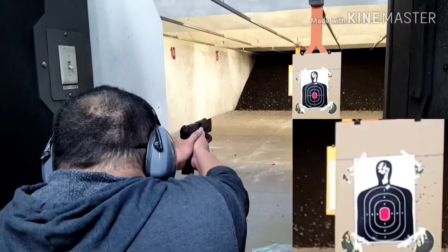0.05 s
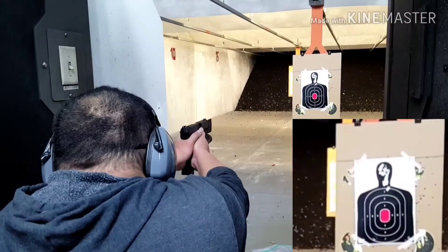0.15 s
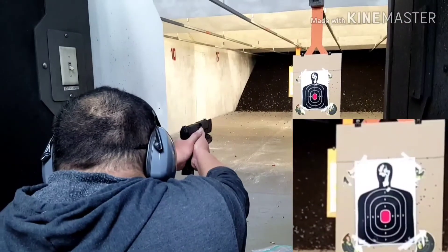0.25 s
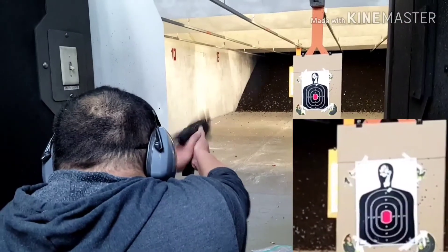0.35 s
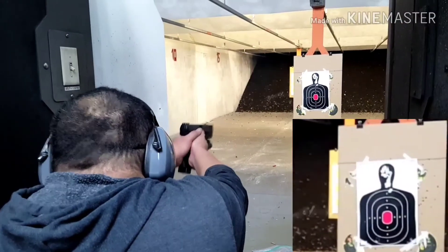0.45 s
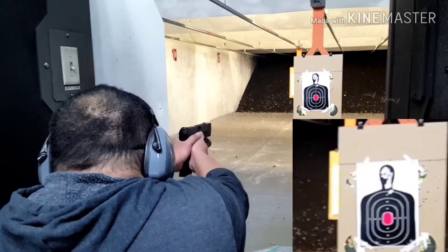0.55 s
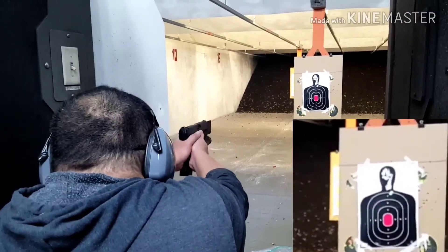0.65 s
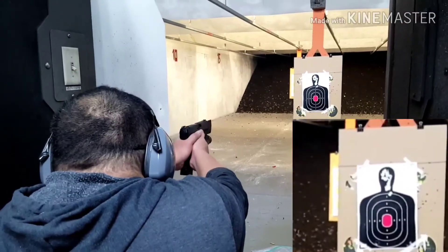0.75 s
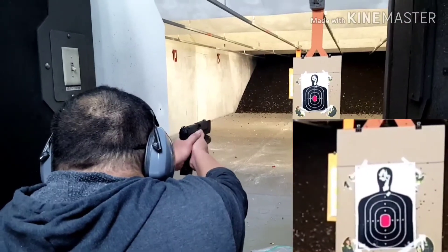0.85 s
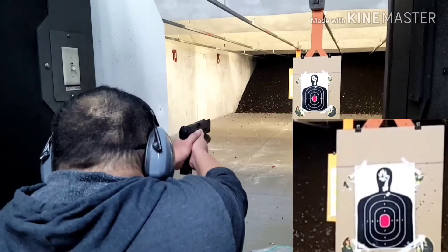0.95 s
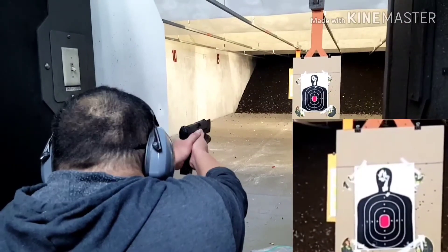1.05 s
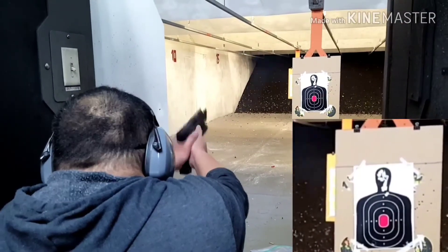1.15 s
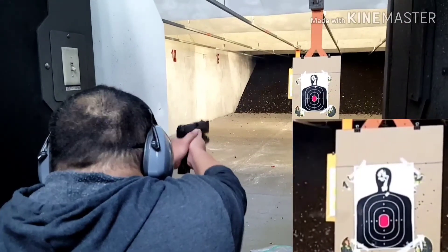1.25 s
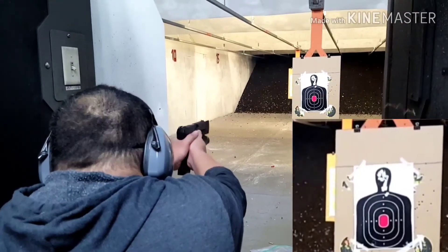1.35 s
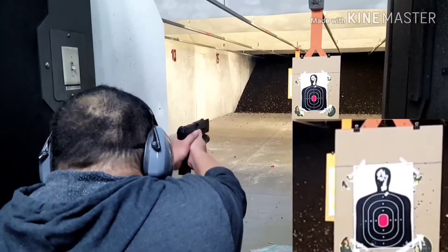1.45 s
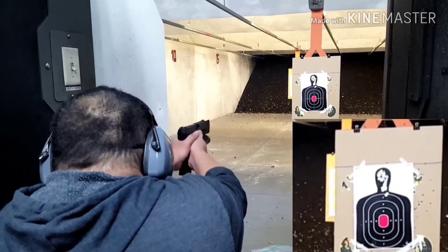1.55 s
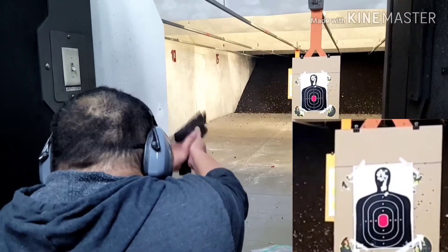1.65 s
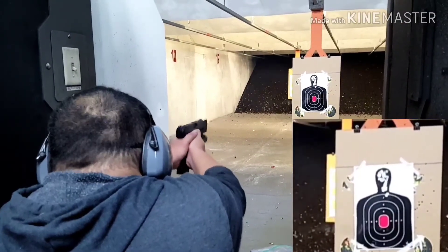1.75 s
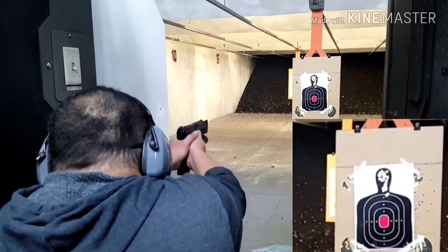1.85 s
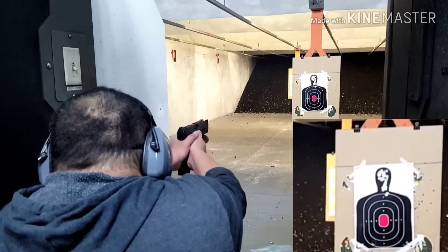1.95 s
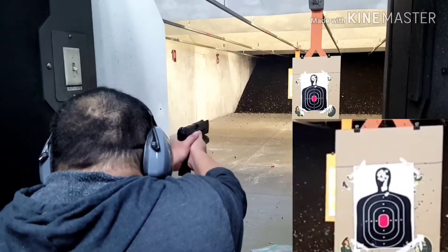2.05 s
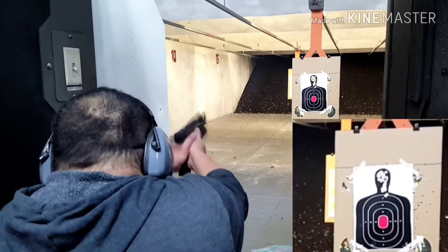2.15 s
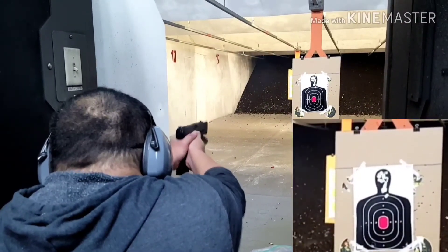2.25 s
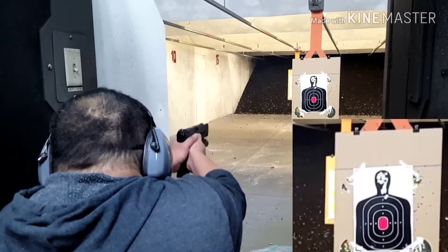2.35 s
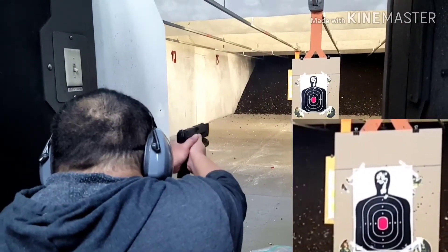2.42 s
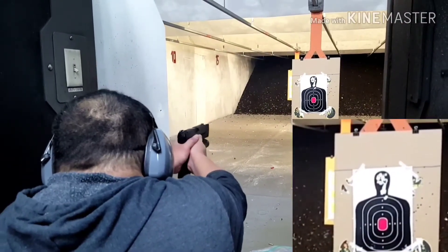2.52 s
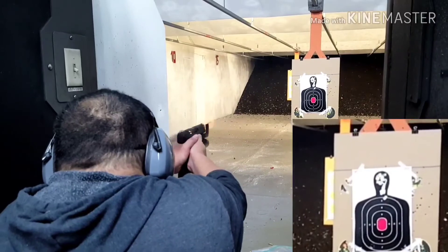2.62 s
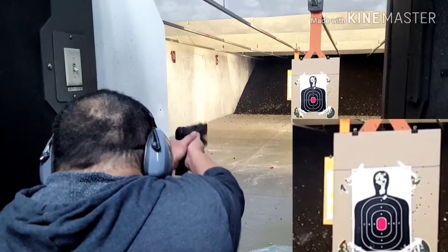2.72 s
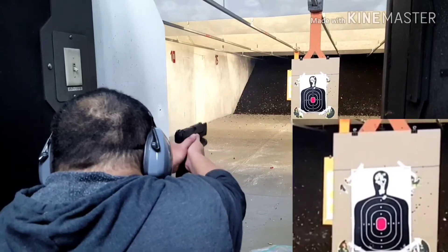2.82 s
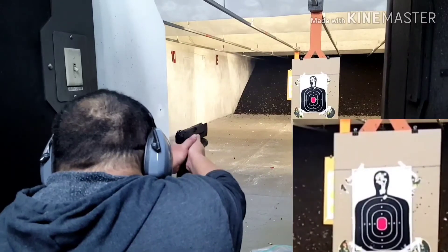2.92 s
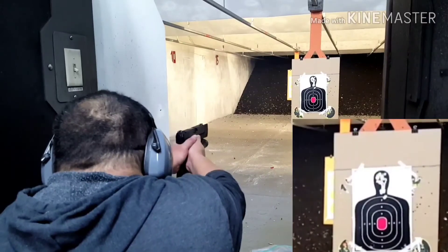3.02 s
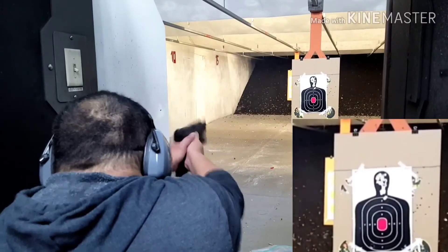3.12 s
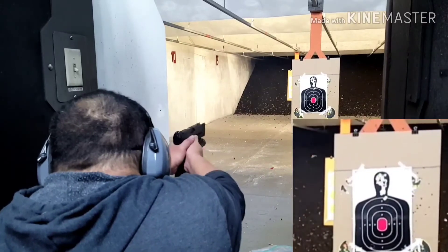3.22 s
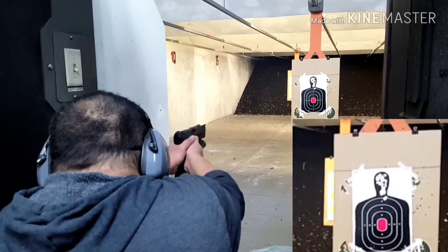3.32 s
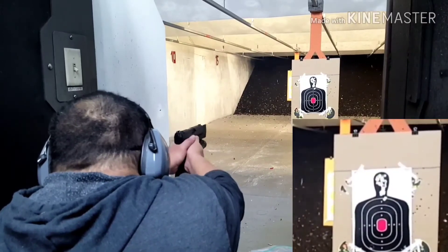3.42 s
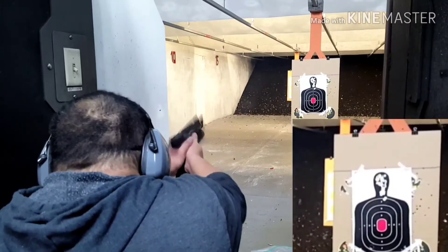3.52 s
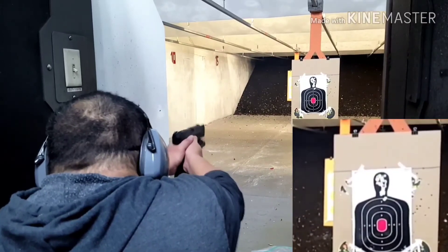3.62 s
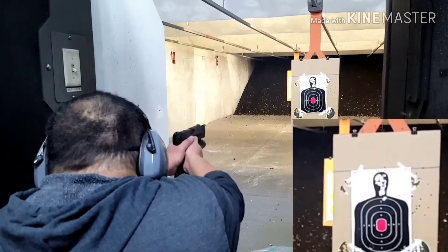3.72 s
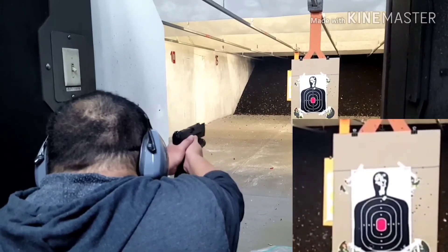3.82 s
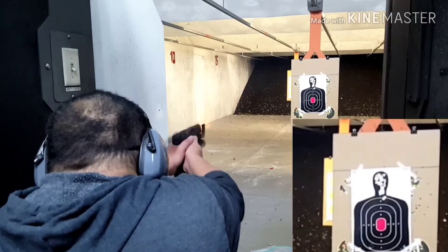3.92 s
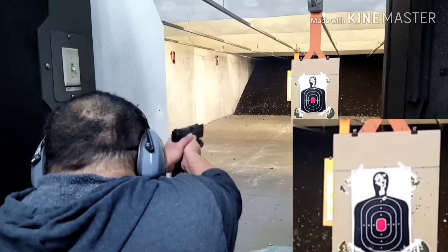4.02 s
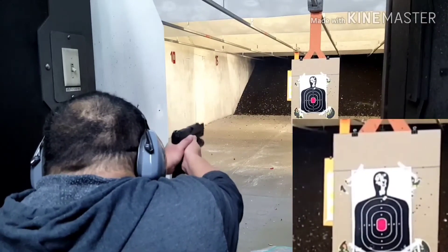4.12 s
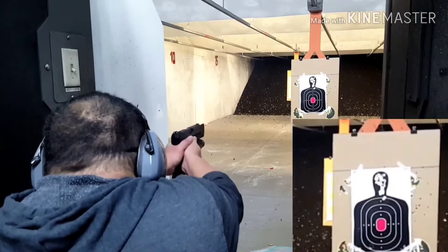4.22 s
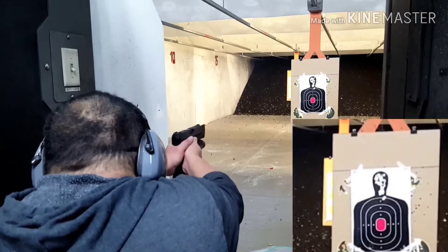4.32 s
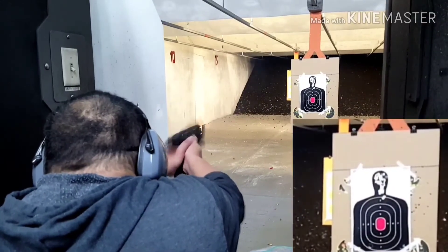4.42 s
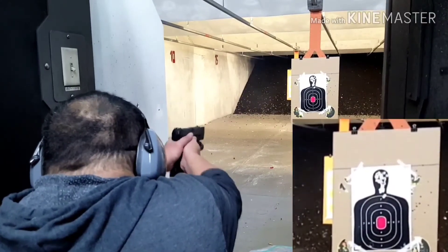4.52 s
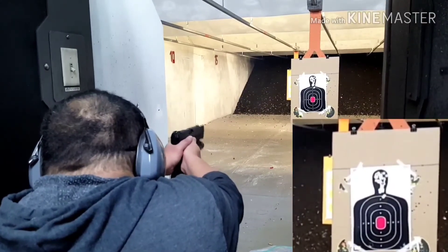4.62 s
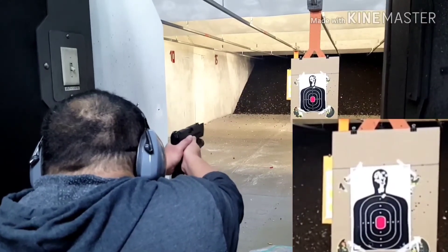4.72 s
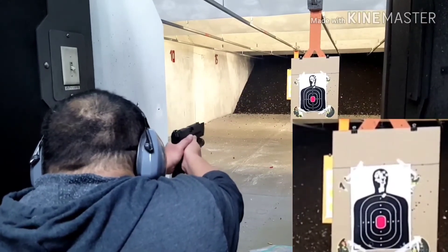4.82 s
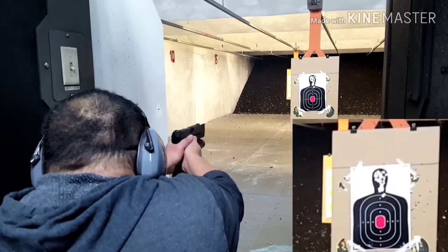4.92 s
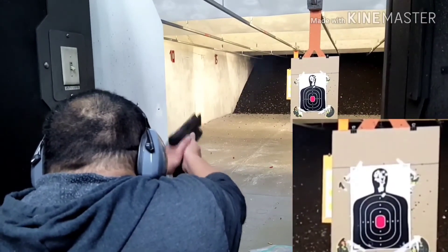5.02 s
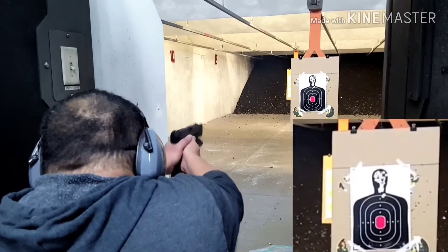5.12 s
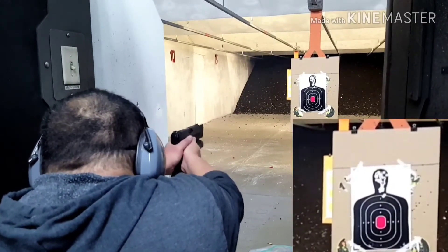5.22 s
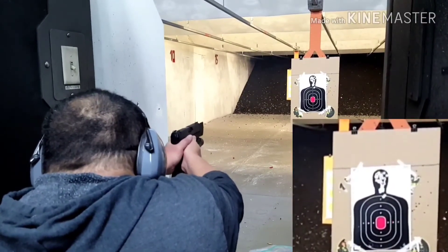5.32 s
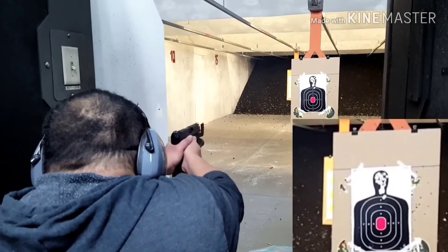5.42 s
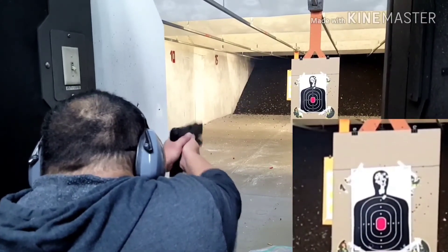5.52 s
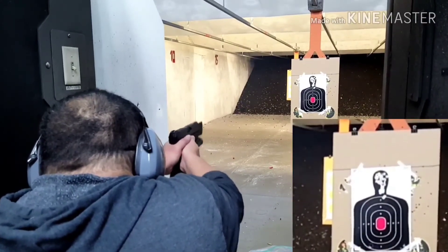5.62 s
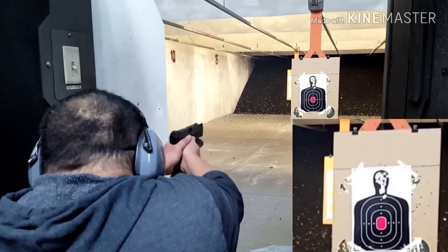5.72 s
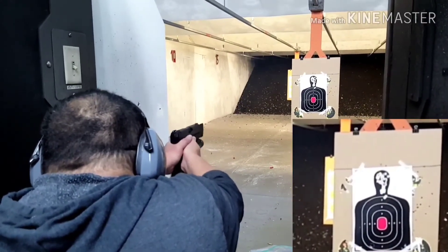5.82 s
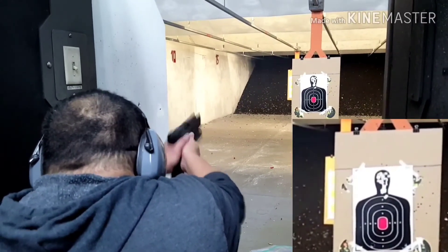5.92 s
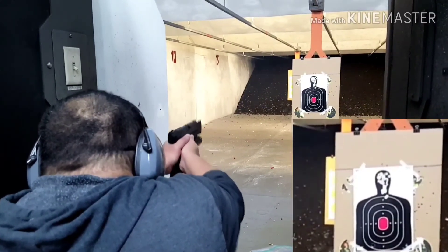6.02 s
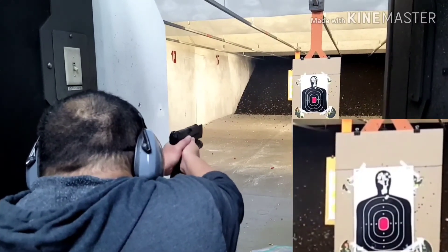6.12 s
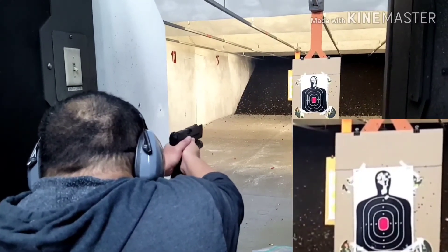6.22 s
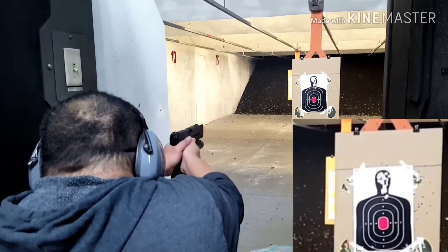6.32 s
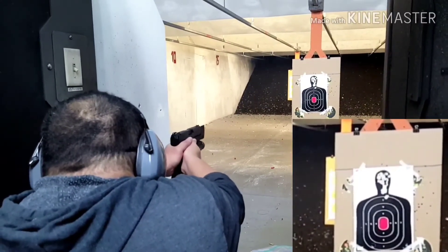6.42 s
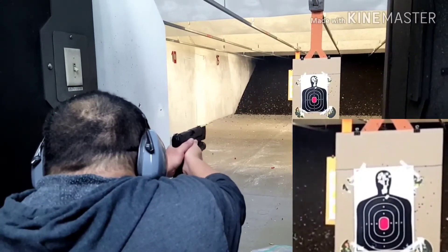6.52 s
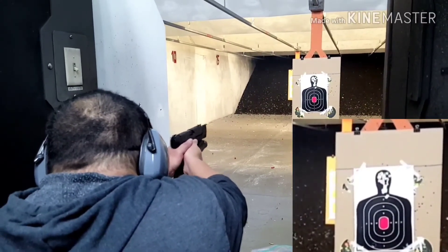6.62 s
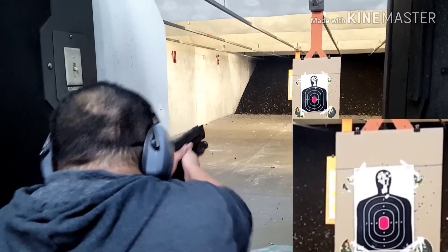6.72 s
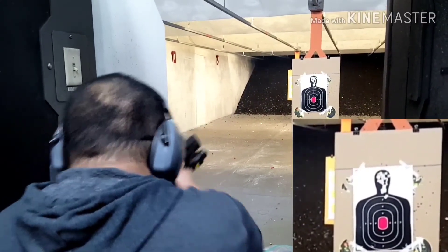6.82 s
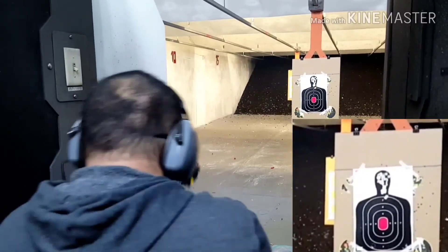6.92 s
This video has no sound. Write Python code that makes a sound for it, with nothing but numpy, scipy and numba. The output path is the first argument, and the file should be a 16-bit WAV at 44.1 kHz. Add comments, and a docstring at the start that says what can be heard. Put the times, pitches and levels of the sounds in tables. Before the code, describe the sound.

A handgun fires steadily about every half second, each distorted blast booming down a long hard lane, with ejected casings tinkling between shots.

```python
"""Twelve pistol shots in a long, low concrete lane, an arm's length from two microphones.
First a ventilation rush, noise and fan tones, hums under a raised gain, which each blast pulls down.
Each blast overloads the microphones: the wave wraps at full scale and fizzes for a fifth of a second.
Then the lane's boom and echoes come through clean, as decaying noise bands, standing waves and returns.
Brass cases crack and ring on the floor; dull clacks, some together with a case's crack, fall among the
later shots and after them."""
import sys
import numpy as np
from scipy import signal
from scipy.fft import rfft, irfft
from scipy.io import wavfile
from scipy.ndimage import uniform_filter1d
from numba import njit

SR = 44100
rng = np.random.default_rng(int(sys.argv[2]) if len(sys.argv) > 2 else 0)


def pcm_store(signal):
    """Save signal as 16-bit PCM."""
    levels = np.round(np.clip(np.atleast_2d(signal), -1, 1) * 32767)
    wavfile.write(sys.argv[1], SR, levels.astype(np.int16).T)


N = 306936
LEFT_LAG = 10  # samples by which shared sound reaches the left microphone later

# Ventilation rush, spectral shape: f/Hz, relative level/dB per Hz
AIR_SPECTRUM = [(15, -75.5), (25, -30), (108, -24.5), (195, -28), (242, -17), (394, -10.5), (427, -11.5),
                (607, -17.5), (1130, -13.5), (3160, -26.5), (3520, -33), (5000, -41.5), (14800, -81.5),
                (16000, -69.5)]
# Fan tones: f/Hz, relative level/dB
FAN_TONES = [(108, -46), (165, -47), (242, -47.5), (427, -48), (500, -51.5), (888, -49), (3418, -73.5),
             (3585, -66), (4500, -69)]
AIR_DB, HUM_DB = -52.5, -52  # rms, before the gain control

# Blasts: t/s, blast level/dB applied to the lane's response, mean break-up length/s
SHOTS = [(0.4586, 1.5, 0.2), (1.2384, 1.5, 0.2), (1.7445, 1.5, 0.21), (2.2488, 1.5, .2), (2.7505, 2, .202),
         (3.1775, 1.5, .206), (3.619, 2, 0.2), (4.0498, 2, 0.2), (4.5398, 2, .2), (5.1114, 2, 0.2),
         (5.5655, 2, .204), (6.0009, 2.5, 0.2)]
# Diffuse field of the lane: f/Hz, level/dB at SETTLED_S before blast level and muting, t60/s,
# likeness of left and right (0-1)
LANE_BANDS = [(139.7, -39, 1.6, .9), (202.44, -33, 1.5, .9), (298.3, -28.5, 1.0, .9), (432, -31, 1.0, .85),
              (597.5, -22.5, .9, .7), (853.5, -23, 1.2, .6), (1144, -24, 1.0, .5), (1554, -20, .85, .5),
              (2100, -24.5, 0.93, .3), (2921, -30, .75, .1), (3979, -34.5, .65, .05),
              (5527, -39, 0.53, .05), (7928, -43, .5, .05), (12008, -47.5, .4, .05)]
# Standing waves of the booth: f/Hz, amplitude/dB at SETTLED_S before blast level and muting, t60/s
BOOTH_MODES = [(539.1, -31, .7), (626.3, -30, .6), (703.4, -30, .6), (803, -33, .8), (869.3, -29, 1.5),
               (913.4, -34, 1.9), (937.6, -33, 1.3), (1016.6, -32, .7), (1155.8, -30.5, .6),
               (1366, -33, .6)]
# Strong returns along the lane: t/s after the shot, peak level/dB before blast level, f/Hz
ECHOES = [(0.051, -15, 714.7), (0.072, -11.5, 1278), (.116, -12.5, 893), (.156, -13.5, 1795),
          (0.229, -11.5, 1330), (0.258, -21, 622), (.291, -15.5, 1425), (0.307, -15.5, 610),
          (0.33, -13, 1800), (0.358, -20.5, 1400)]
# Far end of the lane, dying away last, spectral shape: f/Hz, relative level/dB per Hz
FAR_SPECTRUM = [(120, -17), (200, -4), (500, -3), (880, 0), (1400, -5), (2300, -8), (3500, -19),
                (6000, -34.5), (16000, -79)]
# Close booth modes that throb together: f/Hz, relative level/dB
THROB_MODES = [(345, -8), (377, -0.5), (420, 0), (443, 0), (480, -6), (510, -9), (545, -5)]
SETTLED_S = .2  # reference time after a blast, about when the break-up ends
BOOM_TOP_HZ = 700  # below this the diffuse sound counts as boom
FAR_DB, FAR_T60_S = -33, 2.2  # level at SETTLED_S, before blast level and muting
BOOTH_WAVER, THROB_WAVER = .008, .034  # random phase step, radians a sample: blurs each line
ECHO_CYCLES = 3.8  # half length of a return, in cycles of its pitch
# Lesser returns, scattered at random in time, pitch and level: the base level is that at SETTLED_S
SCATTER_COUNT, SCATTER_DB, SCATTER_SPREAD_DB, SCATTER_T60_S = 60, -23, 3, .8
SCATTER_LO_HZ, SCATTER_HI_HZ = 1000, 2600
THROB_START_DB, THROB_TOP_DB = -33, -13.5
THROB_RISE_S, THROB_HOLD_S, THROB_T60_S = .19, .13, .42
# Time between returns, moment of one return, growth of the dips between them
ROUND_TRIP_S, RETURN_S, DIP_DEEPENS_DB_S = .058, .32, 69

# Spectral shapes of the overload's low and high grit: f/Hz, relative level/dB per Hz
RUMBLE_SPECTRUM = [(15, -6.5), (30, -3.5), (70, -6.5), (200, -0.5), (450, -4.5), (900, -14), (20000, -86)]
FIZZ_SPECTRUM = [(2500, -33), (4500, 3), (7000, 1), (10000, -1.5), (13500, -3.5), (16000, -6)]
DRIVE_DB, DRIVE_FALL_DB_S = 30, 92  # overdrive at the blast and its fall
# The clean sound is muted at the blast and comes back steadily
BRIGHT_MUTE_DB, BRIGHT_BACK_S, BOOM_MUTE_DB, BOOM_BACK_S = -17, .17, -25, .23
# Grit level/dB at the blast, at the crest and at SETTLED_S, before patches and lulls
CREST_S = .11
RUMBLE_DB, RASP_DB, FIZZ_DB = (-26.5, -9.5, -20.5), (-12.5, -7, -15.5), (-15.5, -11.5, -15.5)
PATCH_DB = 1.5  # rms swing of the fizz level
# Three lulls before the break-up stops, each shorter than the last; edges scatter at random
LULL_FIRST_S, LULL_EVERY_S, LULL_LENGTH_S, LULL_SHRINK = .176, .011, .0068, .48
LULL_DB, LULL_SCATTER_S = -9.5, .0013

# Brass cases striking floor and walls: t/s, crack level/dB at onset before its room tail,
# ring level/dB before mode levels and tumbling
CASES = [(0.7108, -29.5, -72), (0.9707, -52.5, -84), (0.9837, -46, -82), (1.0204, -65.5, -95.5),
         (1.494, -31.5, -45), (1.9839, -30.5, -60.5), (2.2059, -50, -66), (2.5466, -38.5, -39),
         (2.7217, -52, -39), (2.9806, -31, -53), (3.1128, -44, -50), (3.4451, -38.5, -52),
         (3.8694, -61, -42), (3.929, -51, -51), (4.2896, -28, -42.5), (4.7894, -49, -45.5),
         (5.464, -54, -38.5), (5.4949, -57, -57), (5.5164, -68, -51), (5.8294, -58, -74.5),
         (6.4453, -63, -57), (6.4936, -33, -48.5)]
# Modes of a brass case: f/Hz, relative level/dB, t60/s
BRASS_MODES = [(9927, 0, .25), (9950, -4, .3), (9915, -11, 1.3), (13700, -14, .1)]
CRACK_HZ, CRACK_WIDTH_HZ, CRACK_T60_S = 8450, 6700, .087
CRACK_ROOM_DB, CRACK_ROOM_T60_S = -15.5, .223  # room tail relative to the crack

# Small dull clacks, the last ones as the gun is lowered: t/s, noise level/dB before its decay
CLACKS = [(2.9694, -24), (3.9284, -26), (4.2894, -27), (5.831, -17), (6.2677, -19), (6.7716, -58),
          (6.8184, -54), (6.8578, -56), (6.9083, -47)]
CLACK_HZ, CLACK_T60_S = 3050, .04

# Gain control: boost in quiet, rms threshold, time constants of fall and recovery
QUIET_BOOST_DB, LOUD_DB, DUCK_S, RECOVER_S = 16, -16, .002, 4.
TOP_HZ = 15550


def undb(db):
    """Decibel law: amplitude ratio from a level."""
    return 10 ** (np.asarray(db) / 20)


def level(x, db):
    """Root-mean-square scaling to a level in dB."""
    return x * undb(db) / np.sqrt(np.mean(x ** 2))


def fade(t, t60):
    """Exponential decay by 60 dB in t60, silent before zero."""
    return (t >= 0) * np.exp(-np.log(1000) * np.maximum(t, 0) / t60)


def band(x, lo_hz, hi_hz):
    """Band-pass filtering along the last axis."""
    edges = [lo_hz, min(hi_hz, .45 * SR)]
    return signal.sosfilt(signal.butter(2, edges, "band", fs=SR, output="sos"), x)


def coloured(x, points):
    """Spectral shaping by (f/Hz, level/dB) points, interpolated over log frequency."""
    size, (hz, db) = x.shape[-1], np.transpose(points)
    f = np.maximum(np.arange(size // 2 + 1) * SR / size, 1)
    gain = undb(np.interp(np.log(f), np.log(hz), db, left=-80))
    return irfft(rfft(x) * gain, size)


def pair(size, likeness):
    """Partial coherence: left and right noise with a shared part, later at the left."""
    shared, left, right = rng.standard_normal((3, size))
    share = np.clip(likeness, 0, 1)
    common = np.array([np.roll(shared, LEFT_LAG), shared])
    return np.sqrt(share) * common + np.sqrt(1 - share) * np.array([left, right])


def add(out, s, sound):
    """Superposition: mix a sound in at s seconds."""
    i = int(s * SR)
    out[:, i:i + sound.shape[-1]] += sound[..., :N - i]


def ventilation():
    """Flow noise and fan tones: a coloured, partly shared rush with sines of wandering phase."""
    t = np.arange(N) / SR
    late = t - np.array([[LEFT_LAG], [0]]) / SR
    rush = coloured(pair(N, .27), AIR_SPECTRUM)
    tones = 0
    for hz, db in FAN_TONES:
        waver = np.cumsum(rng.standard_normal(N)) * .05
        tones = tones + undb(db) * np.sin(2 * np.pi * hz * late + waver)
    return level(rush, AIR_DB) + level(tones, HUM_DB)


def throb(late):
    """Beating of close booth modes, evened out so that the swell follows the returns along the lane."""
    waves = 0
    for hz, db in THROB_MODES:
        wander = THROB_WAVER * np.cumsum(pair(late.shape[1], .98), axis=1)
        phase = rng.uniform(0, 2 * np.pi) + wander
        waves = waves + undb(db) * np.exp(1j * (2 * np.pi * hz * late + phase))
    even = waves / (np.abs(waves) + .6)
    rise = np.clip(late / THROB_RISE_S, 0, 1)
    dying = np.maximum(late - THROB_RISE_S - THROB_HOLD_S, 0) * 60 / THROB_T60_S
    depth = DIP_DEEPENS_DB_S * np.clip(late - THROB_RISE_S / 2, 0, THROB_RISE_S + THROB_HOLD_S)
    dips = depth * np.sin(np.pi * (late - RETURN_S) / ROUND_TRIP_S) ** 2
    swell = undb(THROB_START_DB + (THROB_TOP_DB - THROB_START_DB) * rise - dying - dips)
    return band(level(even.real, 0) * swell, 260, 900)


def lesser_returns():
    """Random scattering in time, pitch and level; the base level sinks exponentially with time."""
    when, pitch, size = rng.random((SCATTER_COUNT, 3)).T
    when = SETTLED_S * (1 + 2 * when)
    sinking = 60 * (when - SETTLED_S) / SCATTER_T60_S
    db = SCATTER_DB - SCATTER_SPREAD_DB * np.log(size) - sinking
    hz = SCATTER_LO_HZ * (SCATTER_HI_HZ / SCATTER_LO_HZ) ** pitch
    return zip(when, db, hz)


def lane():
    """Reverberation: bright part, boom and returns, alike for every shot as gun and microphones stay put."""
    t = np.arange(int(1.6 * SR)) / SR
    late = t - np.array([[LEFT_LAG], [0]]) / SR
    parts = np.zeros((3, 2, len(t)))  # bright, boom, returns
    for hz, db, t60, likeness in LANE_BANDS:
        lo, hi = hz / 1.25, hz * 1.25
        wash = band(band(pair(len(t), likeness), lo, hi), lo, hi)
        decay = fade(t, t60) / fade(SETTLED_S, t60)
        parts[int(hz < BOOM_TOP_HZ)] += level(wash, db) * decay
    for hz, db, t60 in BOOTH_MODES:
        phase = rng.uniform(0, 2 * np.pi) + BOOTH_WAVER * np.cumsum(pair(len(t), .9), axis=1)
        wave = undb(db) * np.sin(2 * np.pi * hz * late + phase)
        parts[int(hz < BOOM_TOP_HZ)] += wave * fade(t, t60) / fade(SETTLED_S, t60)
    far = level(coloured(pair(len(t), .5), FAR_SPECTRUM), FAR_DB)
    parts[0] += far * fade(t, FAR_T60_S) / fade(SETTLED_S, FAR_T60_S)
    for s, db, hz in [*ECHOES, *lesser_returns()]:
        near = slice(int(s * SR) - 1000, int(s * SR) + 1000)
        cycles = (late[:, near] - s) * hz
        packet = np.exp(-(cycles / ECHO_CYCLES) ** 2) * np.sin(2 * np.pi * cycles)
        parts[2, :, near] += undb(db) * packet
    parts[2] += throb(late)
    return parts


def sputter(t, length):
    """Intermittency: a gate with three shrinking lulls and a scattered end at each microphone."""
    gate = 1. * (t < length + LULL_SCATTER_S * rng.standard_normal((2, 1)))
    for k, (early, late) in enumerate(LULL_SCATTER_S * rng.standard_normal((3, 2, 2, 1))):
        start = LULL_FIRST_S + k * LULL_EVERY_S
        end = start + LULL_LENGTH_S * LULL_SHRINK ** k
        gate[(t > start + early) & (t < end + late)] *= undb(LULL_DB)
    return uniform_filter1d(gate, size=24)


def breakup(room, length):
    """Overload: past full scale the microphone's count wraps, shattering into rumble, rasp and fizz."""
    t = np.arange(int(.23 * SR)) / SR
    drive = undb(DRIVE_DB - DRIVE_FALL_DB_S * t)
    bright = undb(BRIGHT_MUTE_DB * np.maximum(1 - t / BRIGHT_BACK_S, 0))
    boom = undb(BOOM_MUTE_DB * np.maximum(1 - t / BOOM_BACK_S, 0))
    rumble, rasp, fizz = (undb(np.interp(t, [0, CREST_S, SETTLED_S], db))
                          for db in (RUMBLE_DB, RASP_DB, FIZZ_DB))
    out, head = room.sum(axis=0), room[:, :, :len(t)]
    swing = drive * head.sum(axis=0) * (1 + .1 * rng.standard_normal())
    # modulo 2 wraps the noisy swing into -1 to 1
    shards = (swing + .15 * rng.standard_normal(swing.shape) + 1) % 2 - 1
    # the fizz comes in random patches
    patches = undb(PATCH_DB * level(uniform_filter1d(rng.standard_normal(swing.shape), size=90), 0))
    grit = rumble * level(coloured(shards, RUMBLE_SPECTRUM), 0)
    grit += rasp * level(band(shards, 424, 3590), 0)
    grit += fizz * patches * level(coloured(shards, FIZZ_SPECTRUM), 0)
    clean = bright * head[0] + boom * head[1] + head[2]
    out[:, :len(t)] = clean + sputter(t, length) * grit
    return out


def shots():
    """Impulsive excitation: each blast sounds the lane and breaks up the microphones."""
    out, room = np.zeros((2, N)), lane()
    for s, db, length in SHOTS:
        add(out, s, breakup(undb(db) * room, length))
    return out


def cases():
    """Impact and modal ringing: a bright crack with a room tail; the case rings unevenly as it tumbles."""
    out, t = np.zeros((2, N)), np.arange(int(.5 * SR)) / SR
    lo, hi = CRACK_HZ - CRACK_WIDTH_HZ / 2, CRACK_HZ + CRACK_WIDTH_HZ / 2
    for s, db, ring_db in CASES:
        hiss = level(band(pair(len(t), .55), lo, hi), 0)
        crack = hiss * (fade(t, CRACK_T60_S) + undb(CRACK_ROOM_DB) * fade(t, CRACK_ROOM_T60_S))
        ring = 0
        for hz, mode_db, t60 in BRASS_MODES:
            wave = np.sin(2 * np.pi * (hz * t + rng.random((2, 1))))
            ring = ring + undb(mode_db) * fade(t, t60) * wave
        # slow random swing of 3 dB rms
        tumble = undb(level(uniform_filter1d(rng.standard_normal(len(t)), size=700), 0) * 3)
        add(out, s, undb(db) * crack + undb(ring_db) * tumble * ring)
    return out


def clacks():
    """Damped impact: short dull knocks, as decaying band noise."""
    out, t = np.zeros((2, N)), np.arange(int(.1 * SR)) / SR
    for s, db in CLACKS:
        knock = level(band(pair(len(t), .37), CLACK_HZ / 1.26, CLACK_HZ * 1.24), db)
        add(out, s, knock * fade(t, CLACK_T60_S))
    return out


def scene():
    """Superposition of everything that reaches the two microphones."""
    return ventilation() + shots() + cases() + clacks()


@njit
def duck(loud, fall, rise):
    """First-order relaxation: the share of boost left drops fast while loud, creeps back after."""
    out, g = np.empty(len(loud)), 1.
    for i in range(len(loud)):
        g += -g * fall if loud[i] else (1 - g) * rise
        out[i] = g
    return out


def record(dry):
    """Gain control, saturation and band limit: loud sound removes the boost, peaks round off, the top is cut."""
    loud = uniform_filter1d(np.mean(dry ** 2, axis=0), size=200) > undb(2 * LOUD_DB)  # power threshold
    share = duck(loud, 1 / (DUCK_S * SR), 1 / (RECOVER_S * SR))
    boosted = dry * undb(QUIET_BOOST_DB * share)
    rounded = boosted / (1 + boosted ** 4) ** .25
    return signal.sosfilt(signal.ellip(10, .2, 60, TOP_HZ, fs=SR, output="sos"), rounded)


dry = scene()
out = record(dry)
pcm_store(out)
```